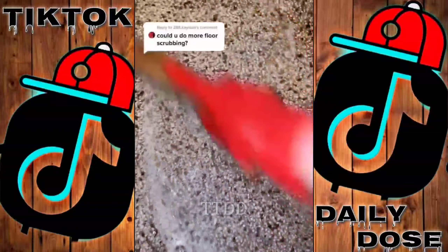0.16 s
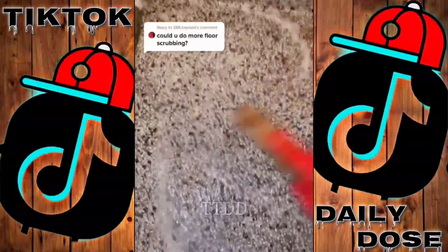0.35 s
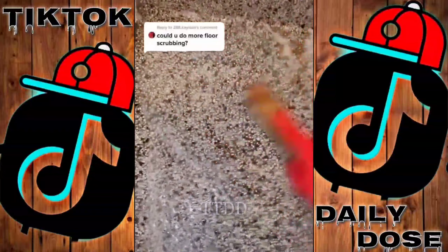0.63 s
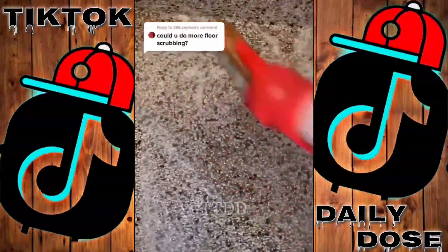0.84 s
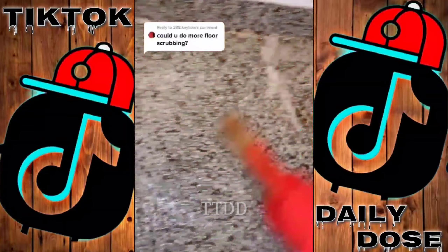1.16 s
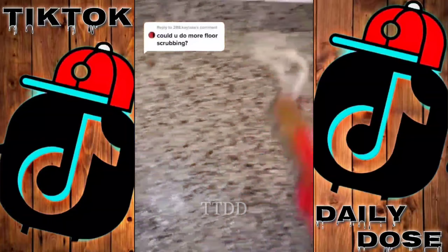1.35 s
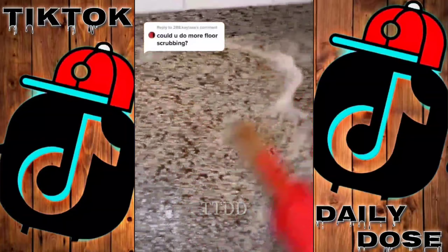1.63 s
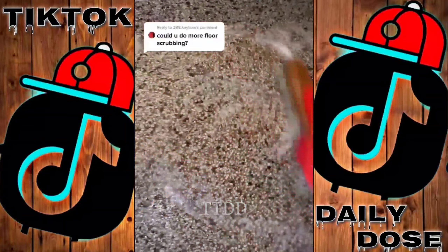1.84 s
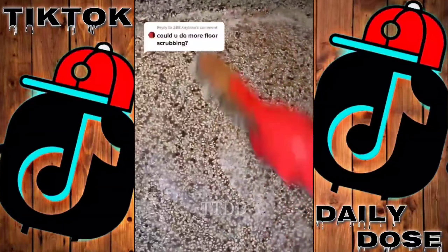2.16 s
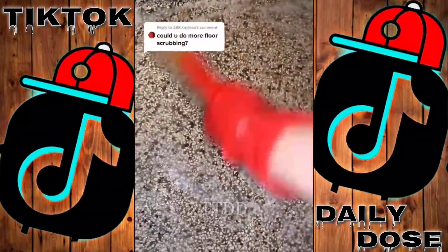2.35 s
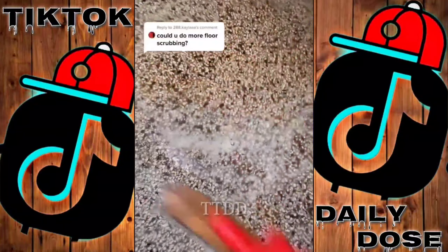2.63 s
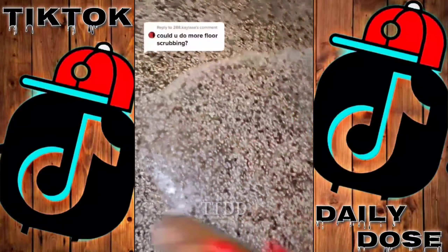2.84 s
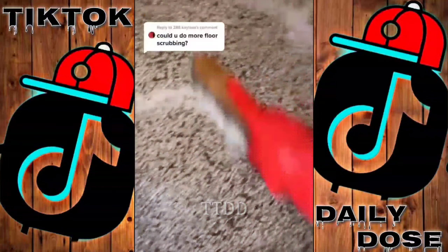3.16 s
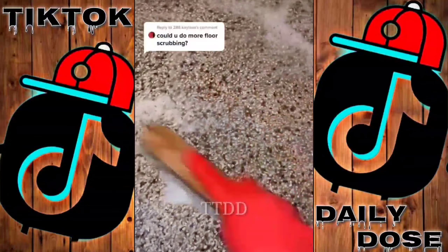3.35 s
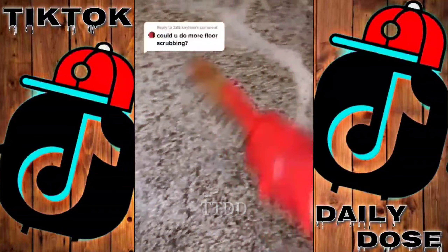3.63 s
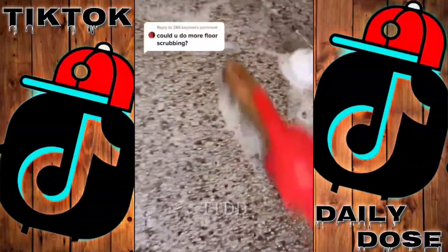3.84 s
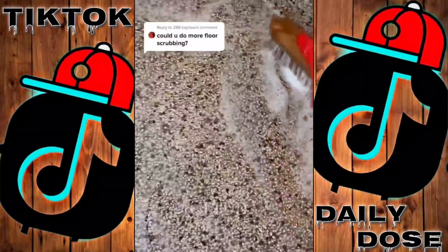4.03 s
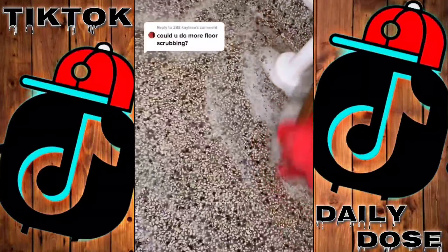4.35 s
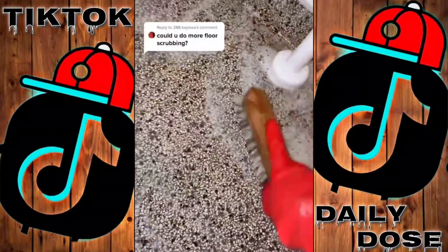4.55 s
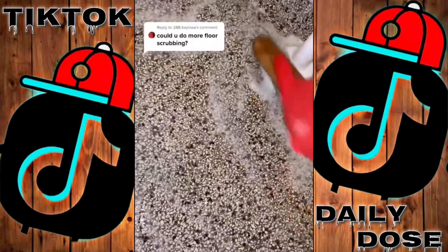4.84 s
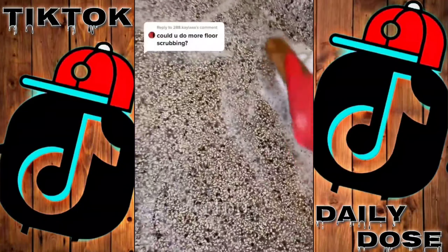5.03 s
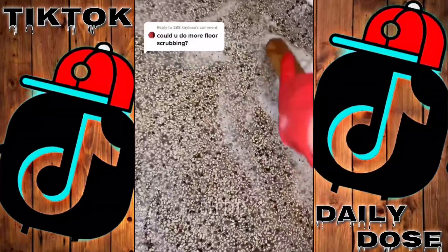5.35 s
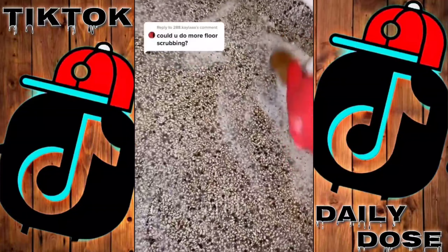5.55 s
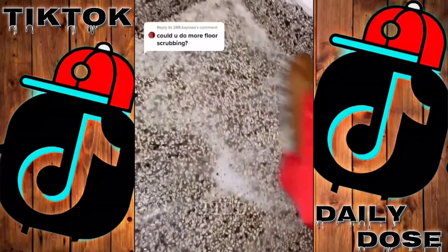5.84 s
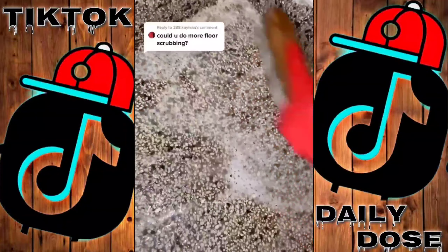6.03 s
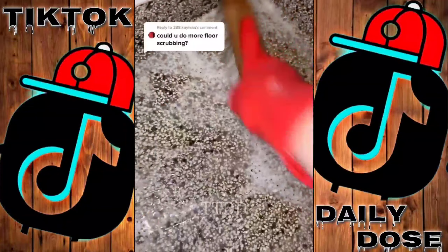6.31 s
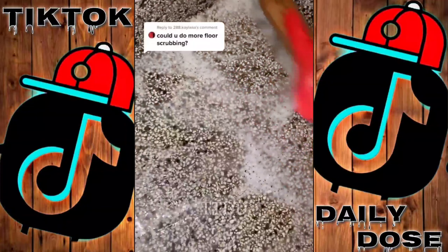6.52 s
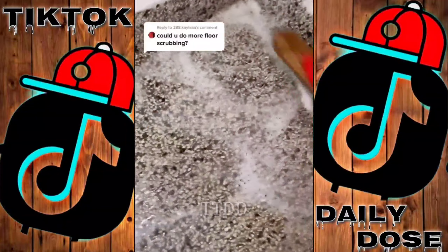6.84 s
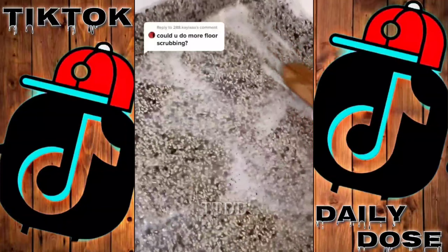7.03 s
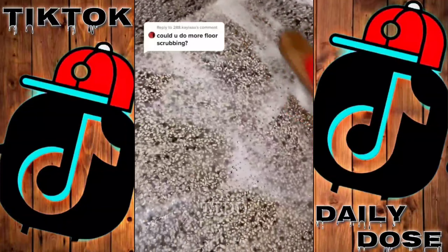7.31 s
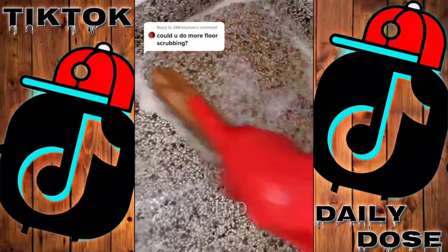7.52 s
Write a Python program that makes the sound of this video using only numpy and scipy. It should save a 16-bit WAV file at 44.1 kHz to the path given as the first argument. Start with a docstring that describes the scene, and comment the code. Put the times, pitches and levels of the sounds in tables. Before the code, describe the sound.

Close, mono scrubbing of a wet, soapy, pebbled floor with a stiff wooden-backed brush. From 0 to 3.9 s, broad hissing sweeps follow one another at about three to six a second, bright and wet, swelling with hand speed and only shallowly dipping at turns; a slight chatter comes near 0.5 s. At about 3.95 s the brush lifts, nearly quiet, then lands with a hollow bump and small knocks. Uneven, lighter strokes lead to a loud wooden clack at 4.23 s. From 4.7 s short, hard, drier strokes run at roughly twelve a second, scratchier and lower in colour. Sound drops out briefly around 5.78 s, returning with a knock at 5.84. Wetter, longer swishes with chatter fill 5.9-6.5 s, then rapid choppy strokes return. A sharp knock at 7.42 s precedes a spitting wet swish and the end. Faint low rumble and short hard-room reflections persist.

```python
"""Hissing sweeps of bristles come first, then short, hard strokes back and forth: a stiff wooden-backed
brush scrubs a wet, soapy, pebbled floor, close to a single microphone. Random bristle flicks over a wet
wash are coloured as rasp and follow the hand's speed, spray and pressure. The wooden block knocks or
judders as struck modes, the room answers briefly, and a low rumble of filtered noise lies beneath."""
import sys
import numpy as np
from scipy import signal
from scipy.fft import rfft, irfft
from scipy.io import wavfile

SR = 44100
rng = np.random.default_rng(int(sys.argv[2]) if len(sys.argv) > 2 else 0)


def store_wav(level_fs):
    """Save 16-bit WAV to argv[1]."""
    pcm = np.round(np.clip(np.atleast_2d(level_fs), -1, 1) * 32767)
    wavfile.write(sys.argv[1], SR, pcm.T.astype(np.int16))


N = 338688
TIME = np.arange(N) / SR

# Bouts of evenly paced strokes, each lasting until the next; levels before push, lift and RASP_DB:
# start_s, strokes (count), top_speed_level_db, turn_level_db
STROKE_BOUTS = [(0.0, 2, -19, -22.5), (0.559, 1, -18, -25), (0.84, 2, -19, -24), (1.225, 2, -20, -22),
                (1.6, 1, -19, -21.5), (1.92, 1, -19.5, -21), (2.055, 1, -19, -24), (2.275, 1, -17.5, -22.5),
                (2.506, 1, -17.5, -22), (2.745, 1, -18, -20.5), (2.98, 1, -18.5, -21.5),
                (3.184, 1, -17.5, -22.5), (3.275, 1, -17.5, -27.5), (3.4, 2, -19, -19.5),
                (3.773, 1, -17.5, -22.5), (3.966, 1, -34.5, -40.5), (4.031, 1, -23, -33),
                (4.202, 1, -28, -32), (4.338, 1, -21.5, -29), (4.408, 1, -24, -30.5), (4.515, 2, -23, -29),
                (4.7, 4, -22.5, -35.5), (5.024, 4, -20, -35.5), (5.363, 2, -24, -35),
                (5.51, 1, -23.5, -36.5), (5.607, 2, -23, -32.5), (5.798, 1, -19.5, -27),
                (5.915, 1, -18, -21.5), (6.16, 2, -21, -24.5), (6.484, 1, -19, -32.5),
                (6.583, 4, -17.5, -36.5), (7.022, 2, -17.2, -35), (7.259, 1, -18.8, -32),
                (7.384, 1, -20, -24.5), (7.513, 2, -19.5, -29)]
# How freely the bristle tips hiss in the suds; the short strokes run drier: time_s, spray_db
SUDS_SPRAY = [(0, 3), (.8, 1.1), (1.6, 1), (2.4, 2), (3.05, 0.5), (3.4, 2), (3.98, -3), (4.14, -.5),
              (4.38, -4.5), (4.62, -1), (4.92, -6.5), (5.7, -5.5), (5.87, -1), (6.25, 0.2), (6.5, -0.5),
              (6.76, -5.5), (7.3, -6), (7.48, 3), (7.68, -3.5)]
# Brief changes of spray, mostly flares, as the bristles cross the suds: centre_s, extra_spray_db
SUDS_SPITS = [(.19, 5), (1.26, 3.5), (1.51, 3), (1.74, 4), (2.33, 3.5), (2.465, 4.5), (3.225, 1), (3.65, 3),
              (4.55, 2.5), (5.5, -3), (6.1, 3.5), (6.2, 7), (6.385, 4), (7.41, 5), (7.559, 7.5)]
# How hard the block is pressed on the floor: time_s, pressure_db
HAND_PRESSURE = [(0, -4), (.92, -1.5), (1.15, -1.5), (2.1, -4), (2.37, -1.5), (2.52, -4), (2.66, 2.5),
                 (2.8, -4), (3.85, -2.5), (4.05, 2.5), (4.4, 10.5), (4.6, -1.5), (4.75, 7.5), (5.5, 8),
                 (5.9, -0.5), (6.3, 6), (7.15, 6), (7.68, 3.5)]
# The brush eases off the floor, then comes back down: lightest_s, depth_db, easing_off_s
BRUSH_LIFTS = [(.8, 4, 0.085), (2.055, 6.5, 0.028), (3.945, 9, 0.072), (4.211, 4, 0.058), (4.51, 5.5, .03)]
# Colour of the rasp ahead of spray and pressure: pitch_hz, level_db
RASP_COLOUR = [(60, -29.5), (210, -21.5), (320, -17.5), (450, -15), (570, -20), (760, -9.5), (1600, -5),
               (2600, -0.5), (4000, -5), (6200, -9.5), (6700, -13), (9700, -13), (11500, -22), (15500, -22)]
# How each register answers the hand: centre_hz, spray_share (0 = none), pressure_share (0 = none)
RASP_REGISTERS = [(100, 0.76, 0), (474, 0, 1), (790, 0, 1), (1310, 0, 0.37), (2170, 0, 0.081),
                  (4600, 0.48, 0.16), (8100, 1.21, 0.04), (13200, 1.26, 0)]
# Modes of the wooden block: pitch_hz, level_db, t60_s
BLOCK_MODES = [(157, -10, 0.04), (293, -12, 0.092), (453, -10, 0.058), (510, -7, 0.023), (836, -0.5, 0.011),
               (1044, -1, 0.0074), (1330, -2.5, 0.0094), (1880, -5.5, 0.0065), (2610, -4.5, 0.0057),
               (3260, -2.5, 0.0077), (4770, 3, 0.0033), (8250, 3, 0.0016), (12500, 3, .001)]
# The block hits the floor: start_s, peak_db, contact_pitch_hz, fall_away (dB per squared octave)
BLOCK_KNOCKS = [(3.978, -24, 3460, 5), (4.016, -18.5, 3520, 3), (4.073, -11.5, 4000, 12),
                (4.2316, 0, 2170, 17), (4.234, -4.5, 706, 13), (5.84, -11, 4000, 3), (6.275, -6, 1490, 2),
                (7.4192, -0.5, 940, 11)]
# A hollow bump as the brush is set down: start_s, level_db, upper_edge_hz (lower is softer)
SET_DOWN_BUMPS = [(3.977, -26, 5000), (3.9796, -12, 1000)]
# Modes of the hollow bump: pitch_hz, level_db, t60_s
HOLLOW_MODES = [(362, -12, 0.32), (453, 1.5, 0.028), (870, 2.5, 0.01), (1180, -1, .016), (2160, -2, 0.055),
                (2400, 7, 0.021)]
# The block chatters over the grit: centre_s, level_db, half_length_s, contact_pitch_hz,
# fall_away (dB per squared octave)
BLOCK_JUDDERS = [(0.515, -16.5, 0.011, 1440, 8), (4.045, -23.5, 0.0076, 800, 2),
                 (4.2322, -11, 0.0027, 1900, 2), (4.248, -29.5, 0.021, 620, 1),
                 (4.703, -29.5, 0.018, 424, 1), (5.505, -37, 0.016, 300, 1), (6.256, -27, 0.031, 1240, 7),
                 (6.396, -16.5, 0.012, 1480, 12), (7.117, -20.5, 0.012, 900, 7.5),
                 (7.424, -31, 0.013, 950, 0.5)]
# Level of the low rumble: time_s, level_db
RUMBLE_LEVEL = [(0, -47), (.7, -62.5), (1.2, -53), (2.1, -58.5), (3.1, -59), (3.98, -45.5), (4.4, -51.5),
                (5.6, -47.5), (6.5, -50), (7.68, -49.5)]
# Colour of the low rumble: pitch_hz, level_db
RUMBLE_COLOUR = [(15, -18), (75, 0), (108, -2), (128, 6), (150, -1.5), (230, -17.5), (1000, -17), (8000, -56)]
# The sound drops out briefly: time_s, level_db
BRIEF_DROPOUT = [(5.755, -2), (5.758, -28), (5.785, -46), (5.798, -52), (5.806, -31), (5.83, -8.5),
                 (5.84, -1.5)]

LAST_TURN_S, LANDING_S, SPIT_S = 7.74, 0.016, 0.014
TOP_SPEED_AT = 0.42  # share of a stroke at which the hand is fastest
ROUNDNESS, SHORT_STROKE_S = 0.54, 0.1  # a short stroke has a flat top; longer ones swell more gradually
PUSH_DB = 2  # strokes come in pairs: the push is stronger than the pull
HAND_WAVER_DB, HAND_WAVER_PER_S = 0.32, 18  # the hand is never quite steady
LEAN_DB, PRESSURE_WAVER_DB = 1, 1.73  # weight rolls onto the block during each stroke, and unevenly
RASP_DB = -1
ROOM_T60_S, ROOM_DB, KNOCK_ROOM_DB = 0.21, -12, -7
CUTOFF_HZ = 15750


def bristles(patchy_db, patchy_rate, bite_share):
    """Spray brightens the rasp, pressure brings out the low registers; each register wavers with the grit."""
    level_db, progress = stroke_db()
    spray_db = in_time(SUDS_SPRAY) + spit_db() + bite_share * bite(level_db, lag_s=0.021)
    press_db = in_time(HAND_PRESSURE) + LEAN_DB * (progress - 0.5) + PRESSURE_WAVER_DB * drift(14)
    snaps = flicks(level_db, per_s=8000, spread_db=3.0, tuft_db=0.2, tuft_rate=70, wash=0.72)
    spectrum = rfft(coloured(snaps, RASP_COLOUR))
    log_hz = np.log(np.arange(len(spectrum)) * SR / N + 1)
    centres = np.log(np.array(RASP_REGISTERS)[:, 0])
    out = np.zeros(N)
    # Each register is a triangle on the log-pitch axis; together they add up to the whole rasp.
    for (_, spray_share, press_share), own in zip(RASP_REGISTERS, np.eye(len(RASP_REGISTERS))):
        band = irfft(spectrum * np.interp(log_hz, centres, own), N)
        hand_db = spray_share * spray_db + press_share * press_db
        out += band * from_db(hand_db + patchy_db * drift(patchy_rate))
    return out * from_db(level_db + RASP_DB)


def flicks(level_db, per_s, spread_db, tuft_db, tuft_rate, wash):
    """Bristles snap free at random, more of them at speed, bunched tuft by tuft, over a wet wash; rms 1."""
    speed = rms_one(from_db(level_db / 2))
    born = rng.random(N) < per_s * speed / SR
    signs = rng.choice([-1, 1], N)
    sizes = from_db(spread_db * np.minimum(rng.exponential(1, N), 4)) * signs
    snaps = rms_one(born * sizes / np.sqrt(speed))
    wet = wash * rng.standard_normal(N)
    return rms_one((snaps + wet) * from_db(tuft_db * drift(tuft_rate)))


def stroke_db():
    """The rasp swells as the hand speeds up and falls at each turn; gives level (dB) and progress 0-1."""
    s, top_db, turn_db = strokes()
    done = np.interp(TIME, np.append(s, LAST_TURN_S), np.arange(len(s) + 1))
    k = np.minimum(done.astype(int), len(s) - 1)
    progress = done % 1
    # Bend the stroke so that its midpoint of phase falls at top speed.
    phase = progress ** (np.log(0.5) / np.log(TOP_SPEED_AT))
    length_s = np.diff(s, append=LAST_TURN_S)
    speed = np.abs(np.sin(np.pi * phase)) ** (ROUNDNESS * np.sqrt(length_s[k] / SHORT_STROKE_S))
    level_db = speed * top_db[k] + (1 - speed) * np.interp(TIME, s, turn_db)
    return level_db - lift_db() + HAND_WAVER_DB * drift(HAND_WAVER_PER_S), progress


def strokes():
    """The bouts dealt out into pulls and pushes: start (s), top level (dB), turn level (dB)."""
    ends = [bout[0] for bout in STROKE_BOUTS[1:]] + [LAST_TURN_S]
    rows = []
    for (start, count, top_db, turn_db), end in zip(STROKE_BOUTS, ends):
        starts = np.linspace(start, end, round(count), endpoint=False)
        pushing = np.arange(len(starts)) % 2
        balance = pushing - pushing.mean()  # keeps the bout's mean level
        rows += [(s, top_db + PUSH_DB * push, turn_db) for s, push in zip(starts, balance)]
    return np.transpose(rows)


def lift_db():
    """Level lost (dB) while the brush eases off the floor and lands again."""
    lost_db = np.zeros(N)
    for s, depth_db, ease_s in BRUSH_LIFTS:
        width_s = np.where(TIME < s, ease_s, LANDING_S)
        lost_db += depth_db * np.exp(-((TIME - s) / width_s) ** 2)
    return lost_db


def spit_db():
    """Bell-shaped, brief changes of spray (dB) as the bristles cross the suds."""
    return sum(db * np.exp(-0.5 * ((TIME - s) / SPIT_S) ** 2) for s, db in SUDS_SPITS)


def bite(level_db, lag_s):
    """How far a stroke has just swelled (dB): bristles flip over and spit as they set off."""
    r = np.exp(-1 / (lag_s * SR))
    return np.maximum(signal.lfilter([r, -r], [1, -r], level_db - level_db[0]), 0)


def floor_bounce(x, lag_s, sway_s, share):
    """A floor path of drifting length joins the direct one, so faint notches glide through the rasp."""
    lag = np.abs(lag_s + sway_s * drift(1.96))
    bounced = np.interp(TIME - lag, TIME, x)
    return (x + share * bounced) / np.hypot(1, share)


def knocks():
    """Single blows of the block ring its modes; the softer bump drives hollow modes with a filtered push."""
    out, click = np.zeros(N), signal.unit_impulse(SR // 2)
    for s, db, pitch_hz, focus_db in BLOCK_KNOCKS:
        blow = block(click, pitch_hz, focus_db)
        add(out, from_db(db) * blow / np.abs(blow).max(), s)
    for s, db, soft_hz in SET_DOWN_BUMPS:
        push = signal.sosfilt(signal.butter(1, [280, soft_hz], "band", fs=SR, output="sos"), click)
        bump = sum(from_db(db + mode_db) * ring(push, hz, t60) for hz, mode_db, t60 in HOLLOW_MODES)
        add(out, bump, s)
    return out


def judders(per_s):
    """A quick run of small blows at random times, swelling and fading, rings the block."""
    out = np.zeros(N)
    for s, db, half_s, pitch_hz, focus_db in BLOCK_JUDDERS:
        blows = (rng.random(N) < per_s / SR) * rng.choice([-1, 1], N)
        swell = np.exp(-0.5 * ((TIME - s) / half_s) ** 2)
        chatter = block(blows * swell, pitch_hz, focus_db)
        out += from_db(db) * rms_one(chatter) * np.sqrt(np.mean(swell ** 2))
    return out


def block(clicks, pitch_hz, focus_db):
    """The wooden block rings most in the modes near the pitch of the contact; their signs alternate."""
    out = 0
    for k, (hz, db, t60) in enumerate(BLOCK_MODES):
        octaves = np.log2(hz / pitch_hz)
        out = out + (-1) ** k * from_db(db - focus_db * octaves ** 2) * ring(clicks, hz, t60)
    return out


def room(x, wall_hz):
    """Dense reflections from hard walls, arriving after 3 ms, dying fast and losing treble above wall_hz."""
    t = TIME[:SR // 2]
    tail = rng.standard_normal(len(t)) * from_db(-60 * t / ROOM_T60_S) * (t > 0.003)
    tail /= np.linalg.norm(tail)
    tail = signal.sosfilt(signal.butter(1, min(wall_hz, SR / 3), fs=SR, output="sos"), tail)
    return signal.fftconvolve(x, tail)[:N]


def rumble(lumpy_db):
    """Low, uneven rumble: filtered noise with one boomy resonance."""
    noise = coloured(rng.standard_normal(N), RUMBLE_COLOUR)
    return from_db(in_time(RUMBLE_LEVEL) + lumpy_db * drift(5.7)) * noise


def from_db(db):
    """Decibels to amplitude."""
    return 10 ** (np.asarray(db) / 20)


def rms_one(x):
    """Scale a signal to rms 1."""
    return x / np.sqrt(np.mean(x ** 2) + 1e-20)


def in_time(rows):
    """A table of (time_s, value) joined by straight lines."""
    return np.interp(TIME, *np.transpose(rows))


def drift(rate):
    """Smooth chance with about rate swings a second; spread 1."""
    r = np.exp(-40 * np.pi * rate / SR)  # worked out at every 20th sample
    noise = rng.standard_normal(N // 20 + 2002)
    slow = signal.lfilter([1], [1, -2 * r, r * r], noise)[2000:]  # skip the filter's start
    return np.interp(np.arange(N) / 20, np.arange(len(slow)), rms_one(slow))


def coloured(x, spectrum):
    """Causal (minimum-phase) filter with the given (pitch_hz, level_db) shape; rms 1."""
    hz, db = np.transpose(spectrum)
    shape = np.interp(np.log(np.arange(N // 2 + 1) * SR / N + 1), np.log(hz), db)
    cepstrum = irfft(np.log(from_db(shape)), N)
    causal = 2 * cepstrum * (np.arange(N) < N // 2)
    return rms_one(irfft(rfft(x) * np.exp(rfft(causal)), N))


def ring(clicks, hz, t60):
    """A damped mode: a unit click sets off a sine starting at about height 1, down 60 dB after t60 s."""
    r, w = from_db(-60 / (t60 * SR)), 2 * np.pi * hz / SR
    return signal.lfilter([0, np.sin(w)], [1, -2 * r * np.cos(w), r * r], clicks + 1e-18)


def add(out, sound, s):
    """Mix a sound in at time s."""
    start = round(s * SR)
    out[start:start + len(sound)] += sound[:N - start]


def scene():
    """Bristles and block sound together in the room; both channels carry the same signal."""
    rasp = bristles(patchy_db=0.87, patchy_rate=13, bite_share=0.48)
    rasp = floor_bounce(rasp, lag_s=0.0018, sway_s=0.000397, share=0.24)
    wood = knocks() + judders(per_s=2000)
    echo = room(from_db(ROOM_DB) * rasp + from_db(KNOCK_ROOM_DB) * wood, wall_hz=9700)
    mono = rasp + wood + echo + rumble(lumpy_db=0.6)
    return np.array([mono, mono])


def record(dry):
    """A brief dropout, a hard ceiling at full scale, then a steep low-pass."""
    held = np.clip(dry * from_db(in_time(BRIEF_DROPOUT)), -1, 1)
    return signal.sosfilt(signal.ellip(12, 0.1, 80, CUTOFF_HZ, fs=SR, output="sos"), held)


dry = scene()
out = record(dry)
store_wav(out)
```